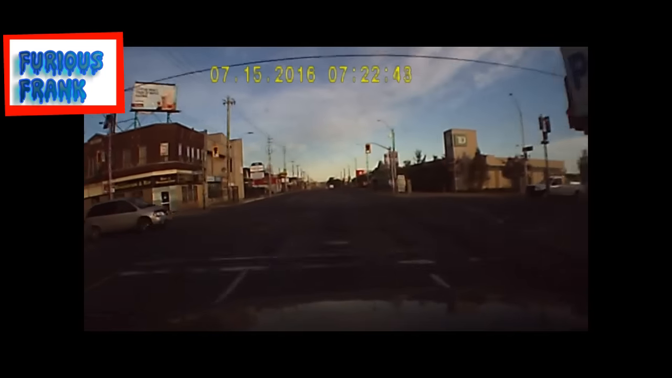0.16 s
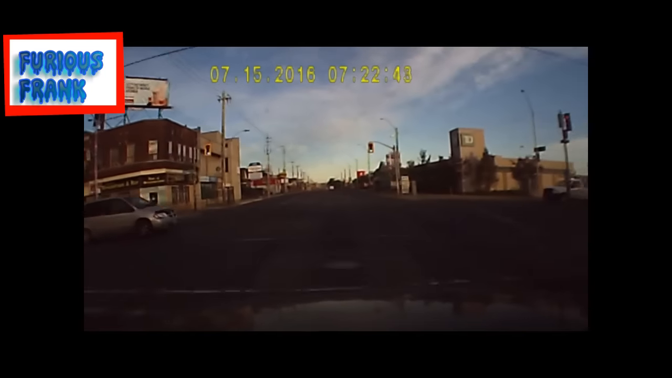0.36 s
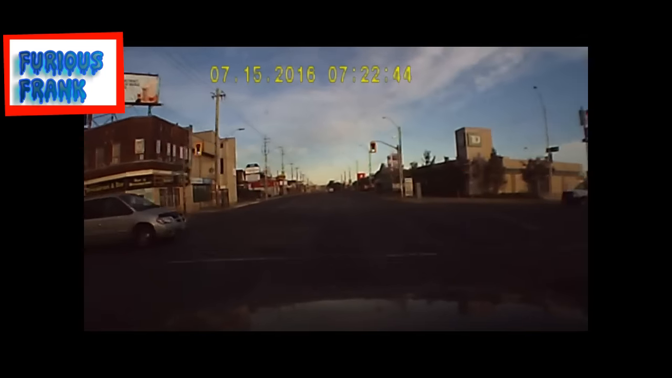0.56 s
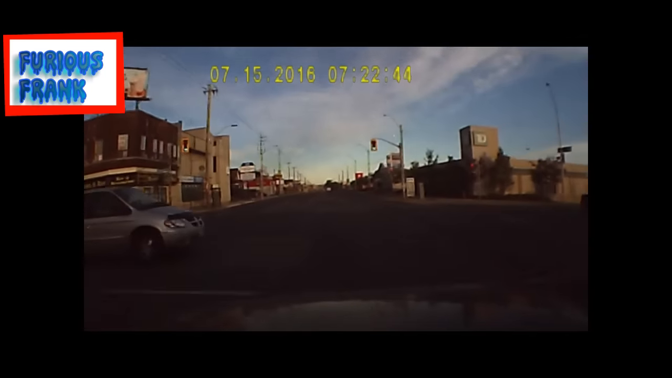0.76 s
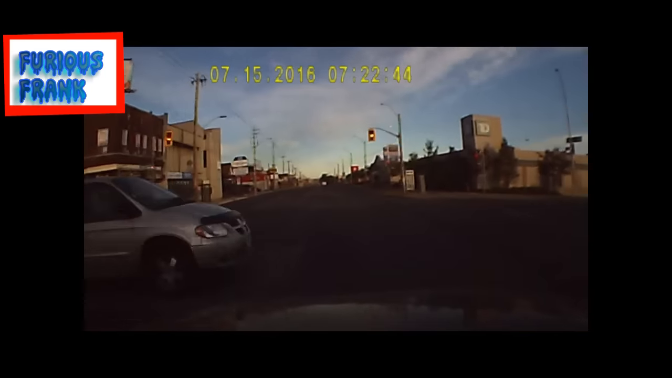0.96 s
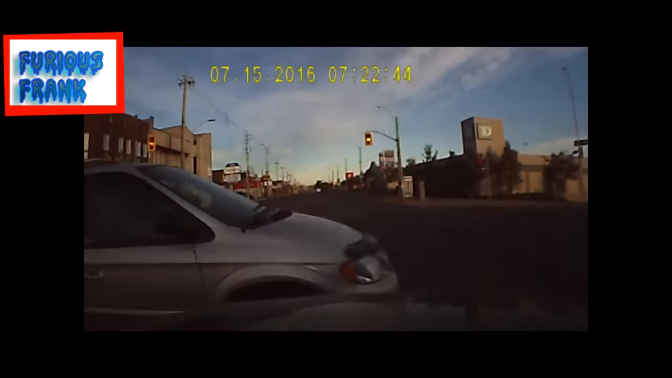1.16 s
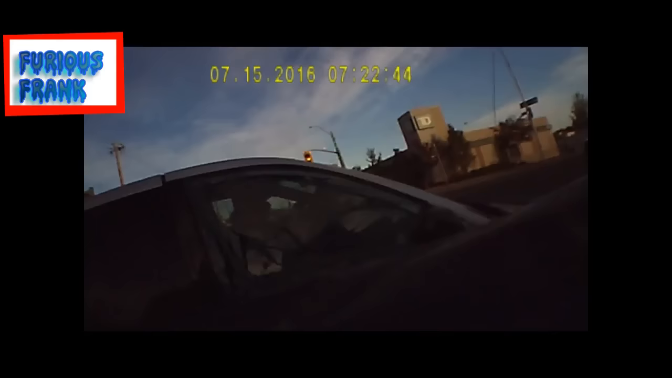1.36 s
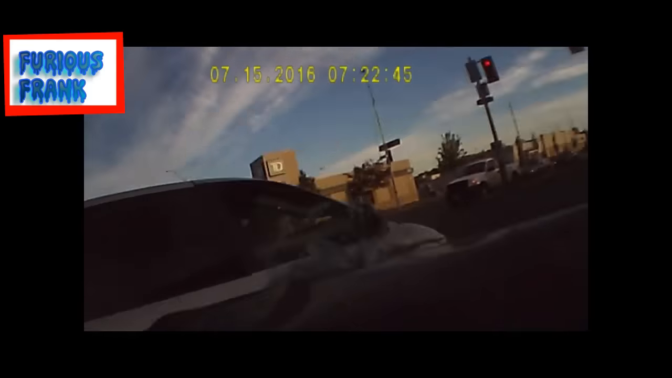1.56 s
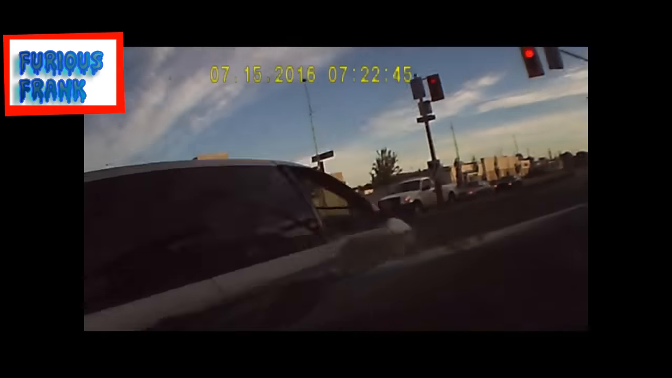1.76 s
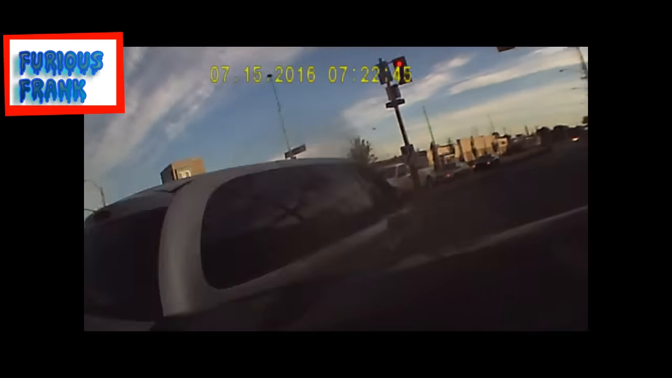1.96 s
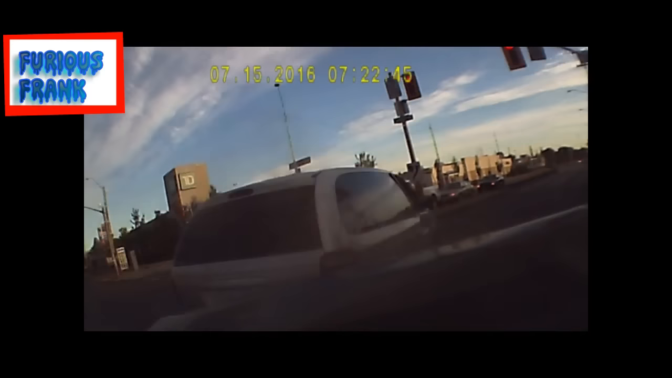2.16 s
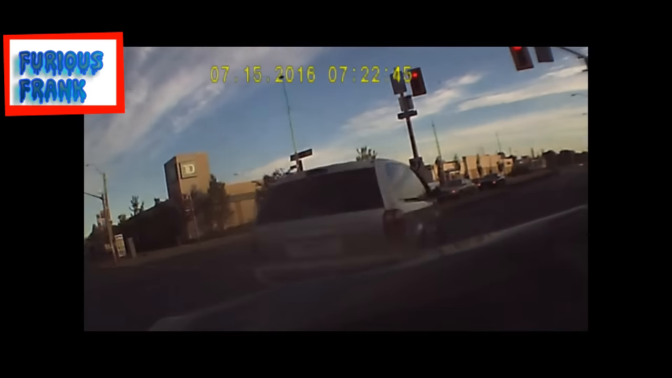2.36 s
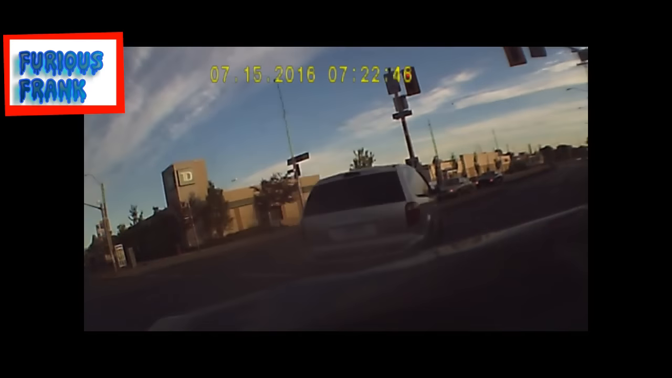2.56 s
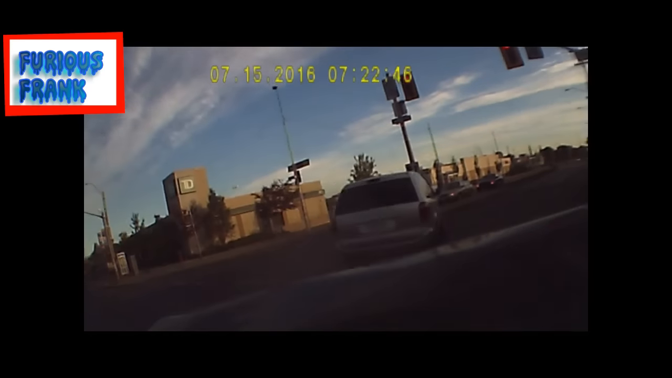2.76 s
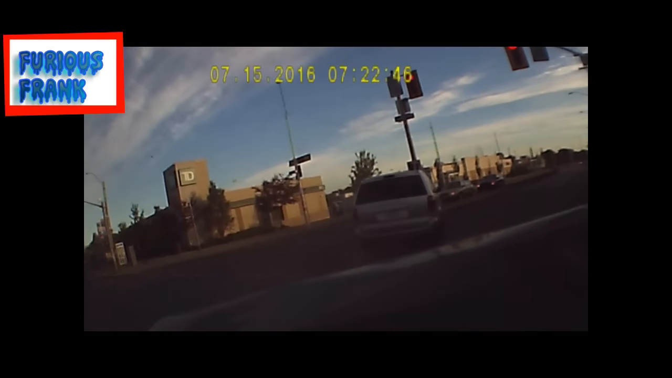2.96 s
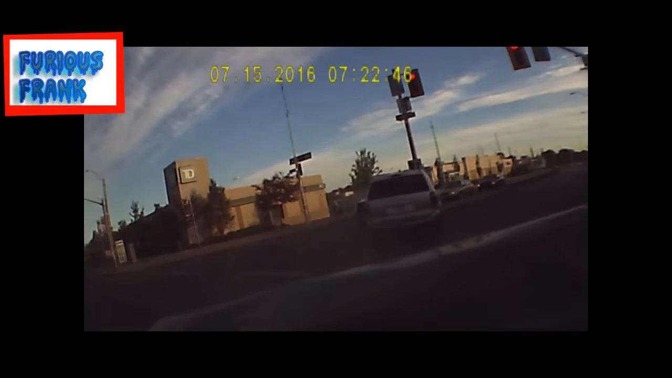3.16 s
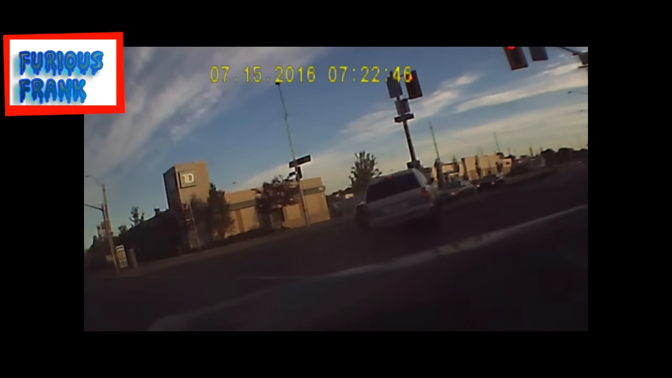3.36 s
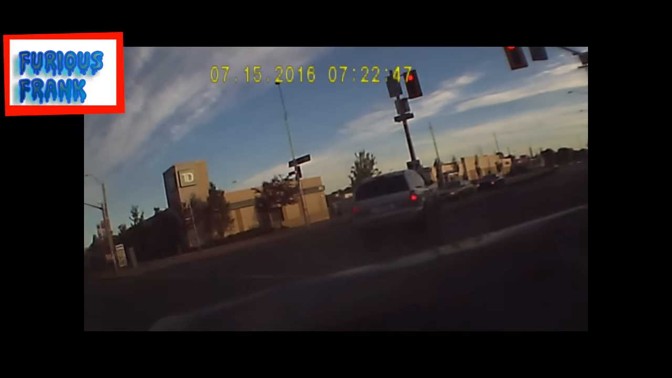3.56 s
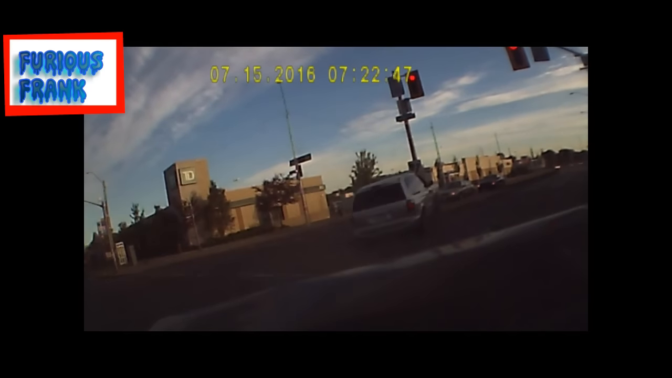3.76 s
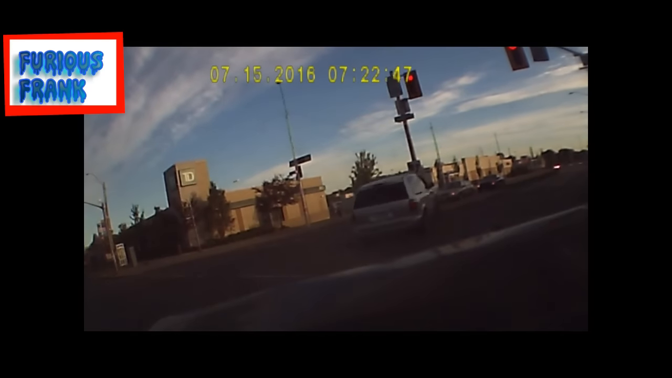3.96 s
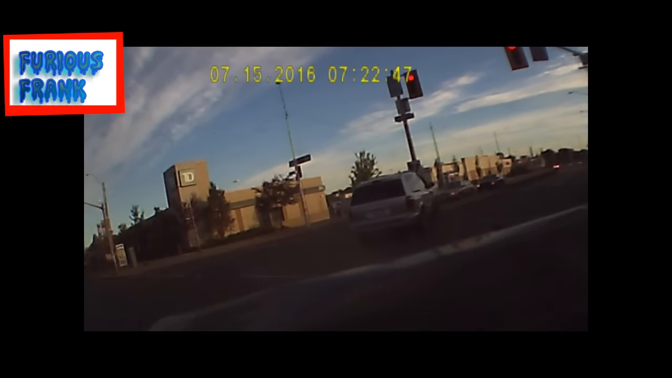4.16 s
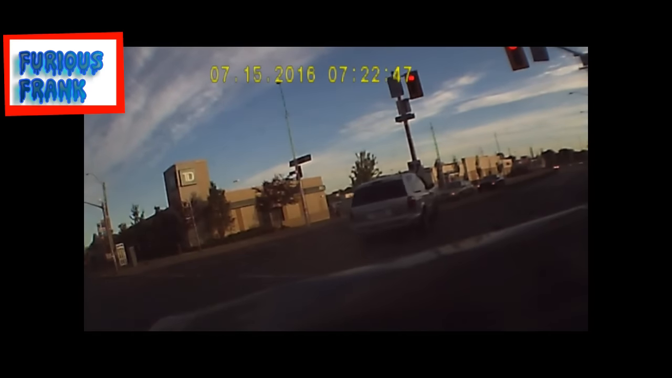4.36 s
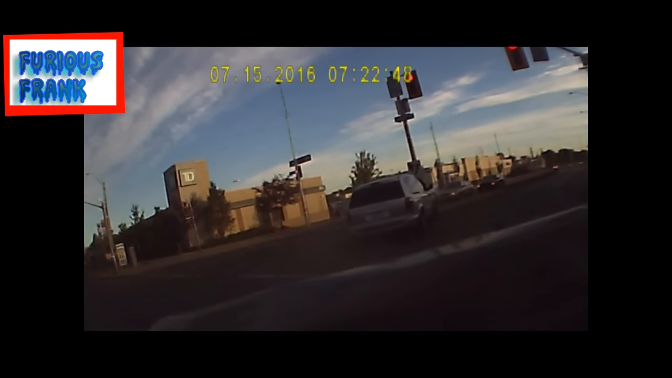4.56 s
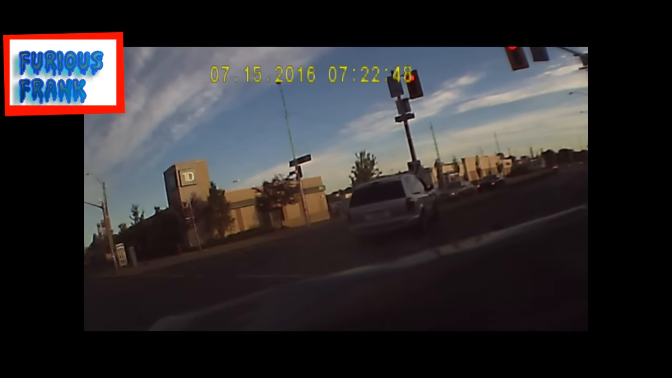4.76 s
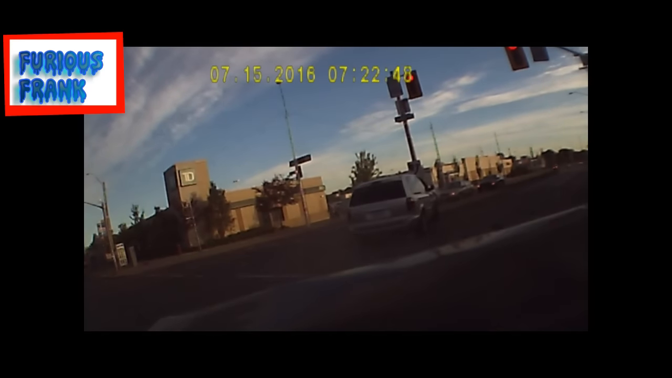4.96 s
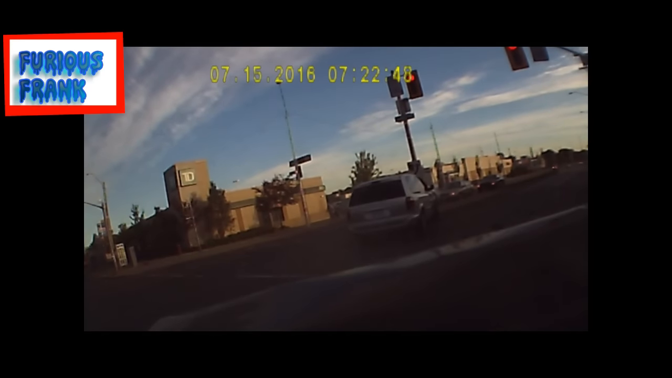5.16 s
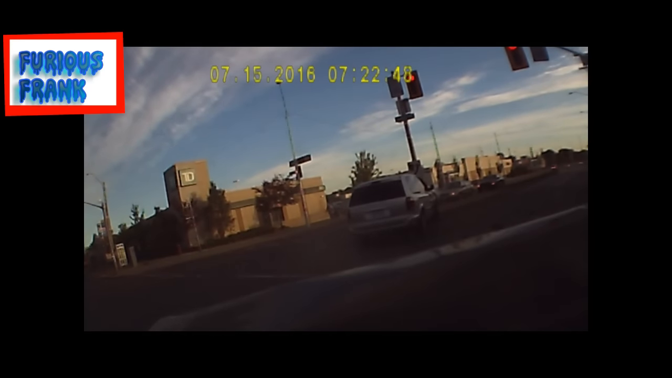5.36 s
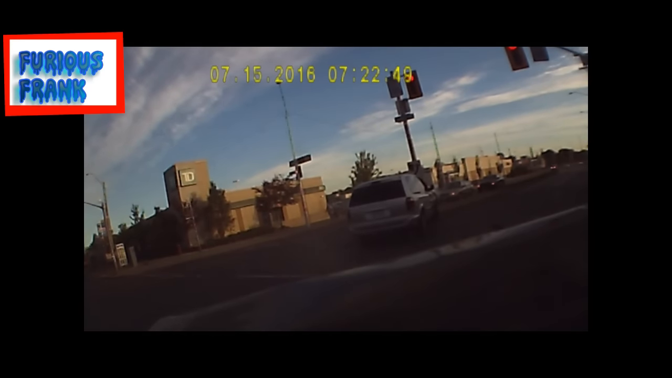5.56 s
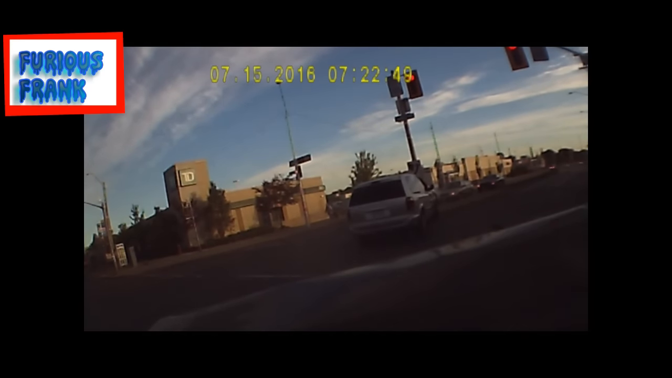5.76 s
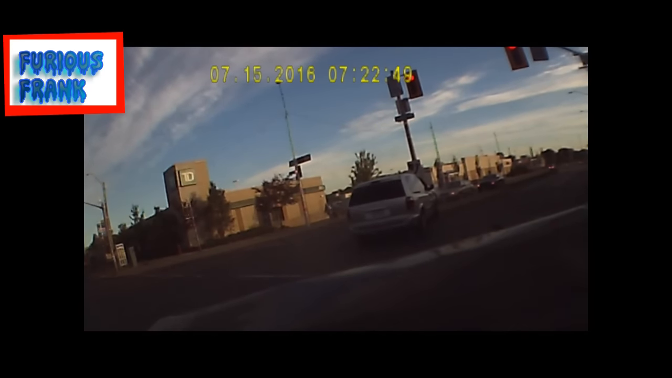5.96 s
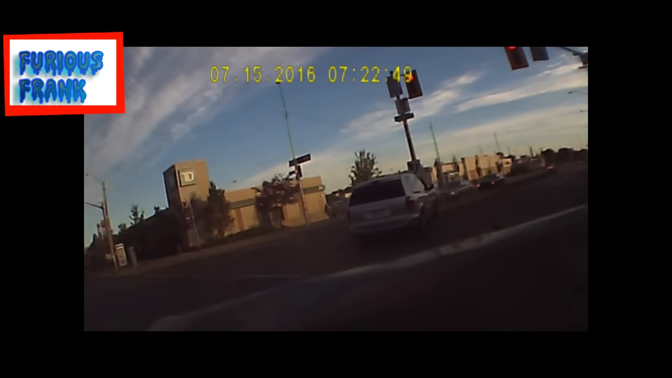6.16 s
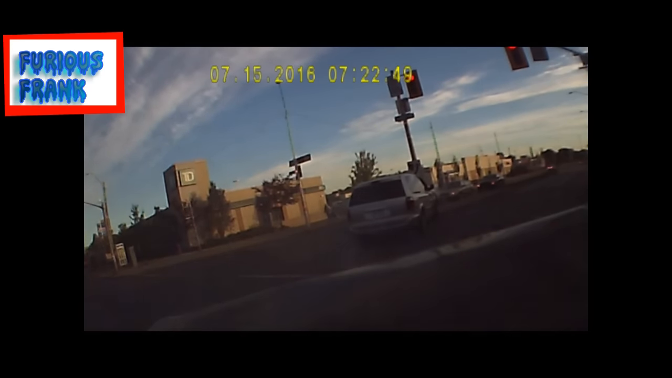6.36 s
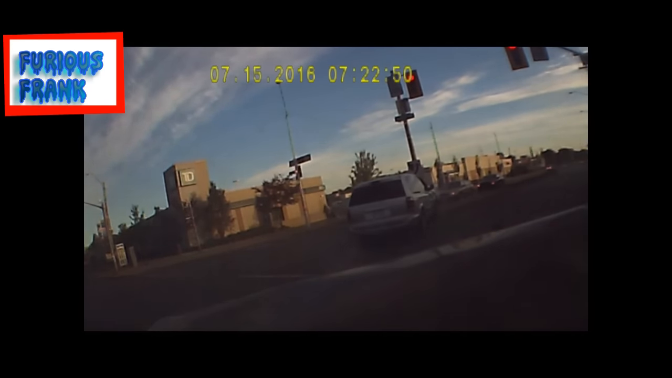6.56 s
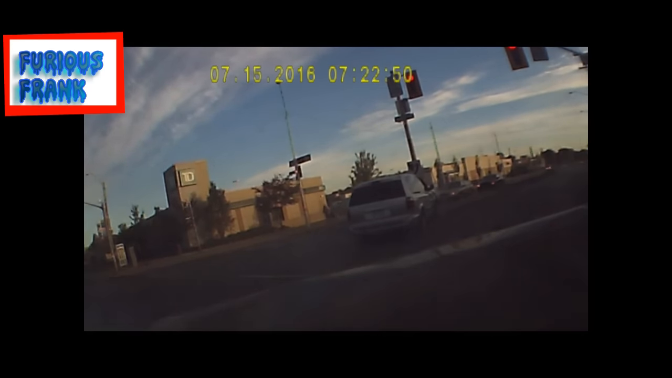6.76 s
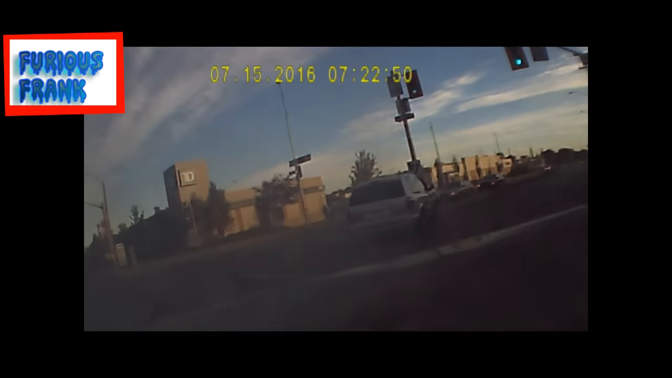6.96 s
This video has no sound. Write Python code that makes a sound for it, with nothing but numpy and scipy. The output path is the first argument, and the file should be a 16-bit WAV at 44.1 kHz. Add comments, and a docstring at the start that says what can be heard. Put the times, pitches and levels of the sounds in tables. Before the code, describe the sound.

A car smashes into a van, heard from inside: distorted crumpling metal, two horn toots, a tyre squeal, then knocks and faint rustling.

```python
"""Side-on crash from inside the car

A car runs into the side of a van at a crossing, heard by a small microphone on its windscreen.
Sheet metal crumples and surges of cabin air choke the microphone; a horn sounds twice, a tyre squeals.
The car jolts on and scrapes to a stop, glass crumbs drop, and loose things knock and rustle."""
import sys
import numpy as np
from scipy import signal
from scipy.fft import rfft, irfft, next_fast_len
from scipy.io import wavfile
from scipy.ndimage import map_coordinates

SR = 44100
rng = np.random.default_rng(int(sys.argv[2]) if len(sys.argv) > 2 else 0)


def wrap_up_sound(samples):
    """Save the sound to the file named by the first command line argument, as 16-bit audio."""
    columns = np.atleast_2d(samples).T
    # keep every value between -1 and 1, then stretch to whole-number steps
    tamed = np.clip(columns, -1, 1)
    steps = np.round(tamed * 32767).astype(np.int16)
    wavfile.write(sys.argv[1], SR, steps)


N = 308700
SPENT_DB_PER_S = 31  # a contact weakens as the cars lose speed

# The cars grind together: head on, along the side, then glancing.
# Each row: start and length in seconds, crumple and body heave levels in dB.
CONTACTS = [(1.217, 0.18, 5.5, -5.5), (1.509, 0.33, -11.5, -12.5), (1.844, 0.28, -21.5, -22.5)]
# Heavy blows to the body. Each row: start in seconds, crunch and clang levels in dB, t60 in seconds.
BLOWS = [(1.207, -12, -17, 0.06), (1.214, 5.5, -4.5, 0.12), (1.308, -1.5, -5, 0.086),
         (1.352, -2.5, -7, 0.17), (1.377, -3, -12, 0.1), (1.405, -2, -8, .05), (1.481, -7, -8, 0.11),
         (1.566, -12.5, -22, 0.076), (1.728, -28, -29, 0.099), (1.862, -6.5, -16, 0.069),
         (1.872, -23, -23, 0.042), (2.168, -38, -6.5, 0.021), (2.402, -32, -24, 0.05)]
# The front end folds. Each row: start and length in seconds, folds per second, level in dB.
FOLDS = [(1.222, 0.051, 240, 10), (1.329, 0.069, 197, -0.5)]
# The cabin is squeezed and springs back. Each row: start and length in seconds, pressure in full scales.
SURGES = [(0.724, 0.02, -0.24), (0.996, 0.02, -0.4), (1.014, 0.022, .2), (1.214, 0.0585, -2.2),
          (1.290, 0.018, -12), (1.336, 0.018, -5), (1.411, 0.0235, -9), (1.433, .028, 2.4),
          (1.459, 0.0225, -3), (1.508, .016, -1.6), (1.768, .016, .25), (1.782, 0.015, -1.3),
          (1.826, .018, .3), (1.842, 0.0215, -0.58), (1.862, .02, .2)]
# Booms as the cars rebound. Each row: start in seconds, level in dB.
BOOMS = [(1.385, 0), (1.523, -1)]
# Modes of the body shell and the dashboard. Each row: pitch in Hz, level in dB, t60 in seconds.
SHELL_MODES = [(131.6, 3, 0.126), (183, -19, 0.2)]
DASH_MODES = [(211.3, -4, 0.19), (339, 1, 0.079), (440, 8, 0.037), (587, -2.5, 0.076)]
# Single panels buckle. Each row: start in seconds, pitch in Hz, level in dB, t60 in seconds.
DENTS = [(1.204, 434, -9, .06), (1.481, 1103, -1.5, 0.071), (1.735, 224, -16, 0.25),
         (1.862, 305, -5.5, 0.055), (1.884, 426, -13, 0.17), (1.903, 215, -19, 0.17)]
# Brittle snaps and falling glass crumbs. Each row: start in seconds, level in dB, t60 in seconds.
SNAPS = [(0.991, -18, 0.025), (1.216, -2, 0.2), (1.231, -3, 0.19), (1.319, -10, 0.033), (1.381, -6, 0.043),
         (1.561, -12, 0.017), (1.727, -21.5, 0.15), (1.772, -24, 0.029), (1.838, -31, 0.037),
         (1.887, -22, 0.02), (1.957, -29, 0.1), (2.038, -22.5, 0.061), (2.19, -34, 0.057),
         (5.606, -31, 0.029)]
SHARDS = [(2.304, -53, .04), (2.752, -43, 0.14), (2.798, -45, 0.093), (2.848, -55, .05),
          (2.906, -44, 0.057), (2.994, -41, 0.099), (3.116, -50, .05), (3.243, -50, .04), (3.48, -44, .1)]
# Horn blasts. Each row: start and length in seconds, level in dB, brightness in dB per octave.
HONKS = [(1.554, 0.14, -15.5, 1.5), (2.054, 0.07, -16, 0)]
# Partials of the horn and the chassis. Each row: multiple of the lowest pitch, relative level in dB.
HORN_HARMONICS = [(1, 7), (2, 0.5), (3, -2), (4, -28), (5, -19.5), (6, -22.5), (7, -25)]
CHASSIS_MODES = [(1, 0.5), (1.65, -4), (2.7, -11), (3.9, -11)]
# Tyre slides. Each row: start and length in seconds, first and last pitch in Hz, level in dB,
# roughness as a share of the pitch.
SKIDS = [(1.603, 0.16, 1252, 1380, -19.5, .11), (1.798, 0.012, 1386, 1448, -16, 0.07),
         (1.818, 0.019, 1476, 1604, -28, 0.082), (1.884, 0.26, 1583, 1455, -31, 0.065),
         (2.201, .19, 1568, 1500, -42, 0.064)]
# Loose trim and belongings strike. Each row: start in seconds, relative level in dB,
# knock and tick trims in dB, t60 of the clack in seconds.
CLACKS = [(0.515, -13, -16, -27, 0.1), (0.523, -2, -11, -15, 0.064), (0.624, -19.5, -24, -12, 0.05),
          (0.688, -22, -7, -16, 0.18), (0.711, 0, -21, -15, 0.022), (0.809, -16, -16, -19.5, 0.065),
          (0.902, -21.5, -2.5, -11, 0.16), (0.959, -18.5, -7, -14.5, 0.14), (1.071, -15, -11.5, -28, 0.055),
          (2.168, -13, -42, -14, 0.17), (2.436, -15, -22, -16, 0.054), (2.457, -18.5, -15, -7.5, 0.07),
          (2.611, -21, -17, -27, 0.08), (2.666, -27, -33, -9, 0.15), (2.797, -29.5, -19, -4, 0.2),
          (2.993, -20.5, -17, -10, 0.16), (3.146, -16.5, -17, -18, 0.19), (3.161, -27.5, -1.5, -6.5, 0.12),
          (3.233, -19, -4.5, -28, 0.079), (6.681, -32, -18, -6, 0.057)]
# Wheel and suspension jolts. Each row: start in seconds, level in dB, lowest mode in Hz, t60 in seconds.
THUMPS = [(0.521, -6, 196.4, 0.046), (0.809, -35, 111, .12), (0.955, -16, 101, .12),
          (1.863, -15, 192, 0.072), (2.325, -36, 190, .12), (2.4, -15, 94, 0.1), (2.403, -10.5, 237, 0.065),
          (2.515, -23, 180.4, 0.25), (2.583, -14.5, 95, 0.16), (2.608, -22, 192, 0.087),
          (2.715, -16.5, 98.3, .16), (2.737, -13, 71, 0.14), (2.812, -15, 100.5, 0.13),
          (2.837, -17.5, 70, 0.25), (2.879, -26, 71.5, .18), (3.228, -21, 115, 0.15),
          (3.383, -21, 116.4, .16)]
# Bodywork drags on the asphalt. One row: start and length in seconds, level in dB.
DRAG = (3.22, 0.24, -30)
# Spells of shaking. Each row: start and length in seconds, level in dB.
RATTLES = [(0.64, 0.4, -54), (2.03, 0.098, -48.5), (2.25, 0.64, -57), (3.2, 0.39, -58)]
# Fabric strokes. Each row: peak time and rise in seconds, swish and soft bump levels in dB.
RUSTLES = [(5.21, 0.017, -70, -41), (5.31, 0.093, -44.5, -47), (5.465, 0.087, -46, -43),
           (5.535, 0.05, -40, -39), (5.587, 0.048, -31.5, -36.5), (6.1, 0.099, -53, -44),
           (6.17, 0.37, -48.5, -46), (6.611, 0.041, -47, -33), (6.88, 0.29, -50.5, -50.5)]
# Soft thuds in the standing car. Each row: peak time in seconds, level in dB, rise in seconds.
BUMPS = [(4.73, -45.5, .025), (4.87, -47, 0.028), (5.204, -42, 0.0046), (5.467, -33, .008),
         (6.06, -38, .012), (6.091, -31, 0.0094), (6.124, -37, 0.013), (6.588, -29.5, 0.0064),
         (6.609, -32.5, 0.011), (6.648, -41, .012)]
# The body lurches on its springs. Each row: peak time in seconds, level in dB.
LURCHES = [(0.02, -15), (0.77, -13.5), (1.0, -14), (2.42, -23), (2.79, -36), (3.28, -30)]
# Fader rides for body sway and road roar, which swell under braking and die as the car stops.
# Each row: time in seconds, level in dB.
SWAY_LEVELS = [(0.3, -31.5), (0.65, -21.5), (1.15, -30), (2.0, -25), (2.25, -35), (2.9, -37), (3.7, -41),
               (4.15, -61)]
ROAR_LEVELS = [(0.42, -31.5), (0.72, -28), (0.97, -27.5), (1.17, -31.5), (2.6, -30), (3.05, -38),
               (3.7, -43.5), (4.15, -52)]

# The tone colour of each source. Each row: frequency in Hz, relative spectral density in dB.
CRUNCH_SPECTRUM = [(40, -19.5), (110, 1), (220, 1.5), (420, -2), (800, -5), (1400, -9.5), (1900, -27),
                   (3500, -24), (6000, -42.5), (12000, -49.5)]
CLANG_SPECTRUM = [(300, -31), (600, 2.5), (850, -4.5), (1250, 5.5), (1600, -13.5), (2400, -16), (5000, -46)]
TICK_SPECTRUM = [(1000, 6.5), (2000, 14), (3600, 6.5), (5500, -6.5), (11000, -22)]
GLASS_SPECTRUM = [(1200, -26), (2200, 11), (3500, 11), (4600, -3), (5600, 3), (7000, -9), (8900, 0),
                  (11500, -11)]
PLASTIC_SPECTRUM = [(300, -30), (550, -2), (850, 7.5), (1300, 3.5), (1800, -10), (2600, -20.5),
                    (5000, -39.5)]
SCRAPE_SPECTRUM = [(53, -6), (90, -15), (214, 0.5), (334, -5), (429, -1), (668, -4.5), (794, 2), (891, -7),
                   (1440, -8), (1720, -21), (1960, -18.5), (4950, -39), (9000, -46), (11700, -79),
                   (19800, -120)]
FABRIC_SPECTRUM = [(400, -26), (700, 5.5), (1000, 0.5), (1400, 9), (1700, 5), (2050, 7), (2400, -5),
                   (3200, 0.5), (3900, -4), (5000, -13), (6500, -17), (11000, -32)]
KNOCK_SPECTRUM = [(60, -21), (130, -3), (220, 1), (400, -6), (650, -9), (1500, -45)]
CUSHION_SPECTRUM = [(100, -18), (250, -4), (430, 1.5), (650, -2.5), (1000, -9.5), (1700, -14), (2600, -27),
                    (6000, -47)]
SWAY_SPECTRUM = [(8, -8.5), (22, 4), (42, 1), (60, -12.5), (100, -28), (200, -40), (500, -104)]
ROAD_SPECTRUM = [(41, -44), (75, 4.5), (150, 0), (210, 2), (310, -1.5), (450, -6.5), (700, -7.5), (950, -8),
                 (1380, -13.5), (1650, -24), (2500, -34), (5000, -59), (8000, -55)]
TRAFFIC_SPECTRUM = [(41, -27), (75, 2), (150, -7), (220, 0.5), (340, -10), (430, -4), (550, -10), (680, -6),
                    (1450, -8.5), (1800, -20.5), (3500, -57), (8000, -41)]
FIZZ_SPECTRUM = [(900, -12), (2000, 1), (2700, -0.5), (3500, -0.5), (4700, -7), (8000, -11.5), (11300, -14),
                 (13000, -28)]
HISS_SPECTRUM = [(100, -3), (2000, -1.5), (5000, 3), (10500, 2.5), (11600, 1), (12800, -24), (15000, -40)]
# Overall tone: nearly flat, with the top treble cut away above about 12 kHz.
# Each row: frequency in Hz, gain in dB.
TREBLE_CUT_EQ = [(20, -2.5), (11200, -4.5), (12400, -17), (15800, -24)]
# What bleeds through the overloaded microphone. Each row: frequency in Hz, gain in dB.
BLEED_EQ = [(200, -22), (1500, -18.5), (6000, -4.5), (11000, 0)]


def crumpling():
    """Sheet metal buckles in a dense crackle between heavy blows that crunch and clang."""
    start, length, crumple_db, _ = np.transpose(CONTACTS)
    crush = held(zip(start, length, crumple_db), attack_s=0.013,
                 sag_db_per_s=SPENT_DB_PER_S, release_db_per_s=240)
    buckling = crush * amp(5.1 * wobble(60)) * grains(rate=1300, spread_db=2)
    blow_s, crunch_db, clang_db, t60 = np.transpose(BLOWS)
    crunch = driven(buckling + bursts(blow_s, crunch_db, t60), CRUNCH_SPECTRUM)
    clang = driven(bursts(blow_s, clang_db, t60), CLANG_SPECTRUM)
    return crunch + clang


def folding():
    """Crumple zones give way fold by fold and shake the body at an uneven rate."""
    out = np.zeros(N)
    for s, length, rate, db in FOLDS:
        force = held([(s, length, db)], attack_s=0.015, sag_db_per_s=SPENT_DB_PER_S, release_db_per_s=600)
        out += force * np.sin(wavering_phase(rate, depth=0.1488, rate=150))
    return out


def heaving():
    """The low end of the crash: the body heaves just after each contact and booms on the rebound."""
    start, length, _, heave_db = np.transpose(CONTACTS)
    heave = held(zip(start + 0.052, length, heave_db), attack_s=0.028,
                 sag_db_per_s=25, release_db_per_s=260)
    return ringing(BOOMS, SHELL_MODES) + heave * noise(SWAY_SPECTRUM)


def air_surges():
    """Slow pushes of cabin air; the strong ones hit more abruptly and pin the microphone."""
    t, out = clock(), np.zeros(N)
    for s, length, pressure in SURGES:
        edge_s = 0.0046 / np.sqrt(abs(pressure))
        ramp = np.clip(np.minimum(t - s, s + length - t) / edge_s, 0, 1)
        out += pressure * np.sin(np.pi / 2 * ramp) ** 2
    return out


def dents():
    """Each panel pops through with one short, slightly unsteady note."""
    out = np.zeros(N)
    for s, hz, db, t60 in DENTS:
        age = np.maximum(clock() - s, 0)
        phase = wavering_phase(hz * (age > 0), depth=0.0088, rate=120)
        out += amp(db - np.minimum(60 * age / t60, 200)) * np.sin(phase)
    return out


def snaps():
    """Brittle plastic and glass crack brightly under strain."""
    return driven(bursts(*np.transpose(SNAPS)), TICK_SPECTRUM)


def horn(pitch_hz=386, rasp_db=1.5):
    """A diaphragm buzzes on one steady note; each harmonic flutters a little."""
    phase = wavering_phase(pitch_hz, depth=0.0015, rate=31)
    partials = []
    for k, db in HORN_HARMONICS:
        flutter = amp(db + rasp_db * wobble(140))
        partials.append((k, flutter * np.sin(k * phase + rng.uniform(0, 2 * np.pi))))
    out = np.zeros(N)
    for s, length, db, bright_db in HONKS:
        tone = sum(amp(bright_db * np.log2(k)) * partial for k, partial in partials)
        blast = held([(s, length, db)], attack_s=0.087, sag_db_per_s=-9, release_db_per_s=420)
        out += blast * unit(tone)
    return out


def tyre_squeal():
    """Tread sticks and slips at a gliding, wavering pitch as the car is pushed sideways."""
    out = np.zeros(N)
    for s, length, first_hz, last_hz, db, roughness in SKIDS:
        glide_hz = np.interp(clock(), [s, s + length], [first_hz, last_hz])
        phase = wavering_phase(glide_hz, depth=roughness, rate=450)
        slide = held([(s, length, db)], attack_s=0.53 * length, sag_db_per_s=16, release_db_per_s=450)
        out += slide * unit(np.sin(phase))
    return amp(1.9 * wobble(90)) * out


def clacks():
    """Each loose thing lands with a clack of plastic, a low knock in the dashboard and a bright tick."""
    s, db, knock_db, tick_db, t60 = np.transpose(CLACKS)
    plastic = driven(bursts(s, db - 9, t60), PLASTIC_SPECTRUM)
    knock = ringing(zip(s, db + knock_db + 2.5), DASH_MODES)
    tick = driven(bursts(s, db + tick_db - 0.5, 0.4 * t60), TICK_SPECTRUM)
    return plastic + knock + tick


def chassis_thumps():
    """Each jolt rings the chassis on a low note of its own; the higher modes die sooner."""
    out = np.zeros(N)
    for s, db, hz, t60 in THUMPS:
        modes = [(k * hz, level, t60 / np.sqrt(k)) for k, level in CHASSIS_MODES]
        out += ringing([(s, db)], modes, detune=0.03)
    return out


def scrape():
    """Bent bodywork grinds over the asphalt until the car stands."""
    pressing = held([DRAG], attack_s=0.04, sag_db_per_s=-4.5, release_db_per_s=37)
    judder = amp(1.4 * wobble(40))
    return pressing * judder * driven(grains(rate=3000, spread_db=-0.5), SCRAPE_SPECTRUM)


def shards():
    """Each crumb of glass lands in a tiny spray of bright ticks."""
    spray = bursts(*np.transpose(SHARDS)) * amp(3 * wobble(270))
    return driven(spray, GLASS_SPECTRUM)


def rattle():
    """Small loose bits tick at random while the car shakes."""
    shaking = held(RATTLES, attack_s=0.042, sag_db_per_s=-9.5, release_db_per_s=114)
    return shaking * driven(grains(rate=1200, spread_db=3), FIZZ_SPECTRUM)


def rustle():
    """Fabric slides and bumps softly against the trim; each stroke swells and stops."""
    swish, bump = np.zeros(N), np.zeros(N)
    for s, rise_s, swish_db, bump_db in RUSTLES:
        stroke = swell(s, rise_s, fall_s=0.52 * rise_s)
        swish += amp(swish_db) * stroke
        bump += amp(bump_db) * stroke
    flutter = amp(2.2 * wobble(70))
    friction = driven(grains(rate=4000, spread_db=-1.5), FABRIC_SPECTRUM)
    return flutter * (swish * friction + bump * noise(KNOCK_SPECTRUM))


def soft_bumps():
    """Soft things nudge the seats and door lining: a rounded rise and a slower fall."""
    nudges = sum(amp(db) * swell(s, rise_s, fall_s=1.44 * rise_s) for s, db, rise_s in BUMPS)
    return nudges * noise(CUSHION_SPECTRUM)


def body_sway(lurch_s=0.053, standing_db=-41):
    """The body sways and lurches on its springs: a deep rumble that sinks to a faint floor."""
    lurching = sum(amp(db) * swell(s, lurch_s, lurch_s) for s, db in LURCHES)
    moving = np.hypot(fader(SWAY_LEVELS), lurching)
    return np.hypot(moving, amp(standing_db)) * noise(SWAY_SPECTRUM)


def road_bed(traffic_db=-45, fizz_over_roar_db=-35, standing_fizz_db=-55):
    """Tyres roar on asphalt under a flickering fizz; dull traffic and faint fizz outlast the stop."""
    rolling = fader(ROAR_LEVELS)
    drift = amp(0.28 * wobble(18))
    roar = rolling * noise(ROAD_SPECTRUM)
    traffic = amp(traffic_db) * noise(TRAFFIC_SPECTRUM)
    fizz_gain = np.hypot(amp(fizz_over_roar_db) * rolling, amp(standing_fizz_db))
    fizz = fizz_gain * amp(1.25 * wobble(25)) * noise(FIZZ_SPECTRUM)
    return drift * (roar + traffic) + fizz


def amp(db):
    """Decibels to gain."""
    return 10 ** (np.asarray(db) / 20)


def unit(x):
    """Scaled to rms 1."""
    return x / np.sqrt(np.mean(x ** 2) + 1e-20)


def clock():
    """The time of every sample in seconds."""
    return np.arange(N) / SR


def fader(points):
    """Gain that rides through (seconds, dB) points."""
    return amp(np.interp(clock(), *np.transpose(points)))


def held(notes, attack_s, sag_db_per_s, release_db_per_s):
    """Gain of (start, length, dB) notes: fully up at the start, sagging (rising if negative), fading."""
    t, out = clock(), np.zeros(N)
    for s, length, db in notes:
        attack = np.clip(1 + (t - s) / attack_s, 0, 1) ** 2
        sag_db = sag_db_per_s * np.clip(t - s, 0, length)
        release_db = release_db_per_s * np.maximum(t - s - length, 0)
        out += attack * amp(db - np.minimum(sag_db + release_db, 200))
    return out


def swell(s, rise_s, fall_s):
    """A rounded bump of height one that peaks at time s."""
    t = clock() - s
    width_s = np.where(t < 0, rise_s, fall_s)
    return np.exp(-np.minimum((t / width_s) ** 2, 20))


def wobble(rate):
    """A smooth random curve, rate knots a second."""
    return map_coordinates(rng.standard_normal(int(N * rate / SR) + 4), [clock() * rate])


def wavering_phase(hz, depth, rate):
    """Phase of a tone whose pitch wanders at random; depth is a share of the pitch."""
    return 2 * np.pi * np.cumsum(hz * (1 + depth * wobble(rate))) / SR


def coloured(x, points):
    """x through a minimum-phase EQ drawn through (Hz, dB) points."""
    size = 2 * next_fast_len(N // 2 + SR // 4)
    hz, db = np.transpose(points)
    gain_db = np.interp(np.log(np.fft.rfftfreq(size, 1 / SR) + 1), np.log(hz), db)
    cepstrum = irfft(np.log(amp(gain_db)))
    cepstrum[1:size // 2] *= 2  # folded forward, so nothing rings ahead of a hit
    cepstrum[size // 2 + 1:] = 0
    return irfft(rfft(x, size) * np.exp(rfft(cepstrum)), size)[:N]


def noise(points):
    """Coloured noise of rms 1."""
    return unit(coloured(rng.standard_normal(N), points))


def grains(rate, spread_db):
    """Tiny random snaps of uneven size, rms 1."""
    clicks = (rng.random(N) < rate / SR) * rng.standard_normal(N)
    return unit(clicks * amp(spread_db * rng.standard_normal(N)))


def driven(force, points):
    """The ring of a body with the given spectrum; a white-noise force keeps its level."""
    return coloured(force, points) / np.linalg.norm(coloured(signal.unit_impulse(N), points))


def bursts(times, levels_db, decays):
    """Rough contacts: noise that starts at once and dies away."""
    out, t = np.zeros(N + SR), np.arange(SR // 2) / SR
    for s, db, t60 in zip(times, levels_db, decays):
        out[round(s * SR):][:len(t)] += amp(db - 60 * t / t60)
    return out[:N] * rng.standard_normal(N)


def ringing(hits, modes, detune=0.067):
    """Blows (seconds, dB) ring the modes of a body, each time a little differently."""
    out, t = np.zeros(N + SR), np.arange(SR // 2) / SR
    for s, db in hits:
        for hz, level, t60 in modes:
            swing = np.sin(2 * np.pi * hz * rng.normal(1, detune) * t)
            attack = 1 - np.exp(-2 * hz * t)
            decay = amp(db + level + rng.normal(0, 1) - 60 * t / t60)
            out[round(s * SR):][:len(t)] += attack * decay * swing
    return out[:N]


def scene():
    """The mono mix: air pressure at the windscreen."""
    crash = crumpling() + snaps() + heaving() + folding() + air_surges() + horn() + tyre_squeal()
    bed = body_sway() + road_bed()
    cabin = rattle() + clacks() + chassis_thumps() + scrape() + rustle() + soft_bumps()
    return (crash + bed + cabin + dents() + shards())[None]


def record(dry, upper=0.43, lower=0.32, hardness=5, hiss_db=-59, choke=4, top_hz=16000, offset=-0.316):
    """The hissing microphone clips lopsidedly on a DC offset; treble bleeds through until it chokes."""
    x = dry[0] + amp(hiss_db) * noise(HISS_SPECTRUM)
    rail = np.where(x > 0, upper, lower)
    clipped = x / (1 + np.abs(x / rail) ** hardness) ** (1 / hardness)
    bleed = coloured(np.tanh(x / choke), BLEED_EQ)
    sound = coloured(clipped + bleed, TREBLE_CUT_EQ)
    high_cut = signal.ellip(N=10, rp=0.1, rs=80, Wn=top_hz, fs=SR, output="sos")
    return signal.sosfilt(high_cut, sound)[None] + offset


dry = scene()
out = record(dry)
wrap_up_sound(out)
```